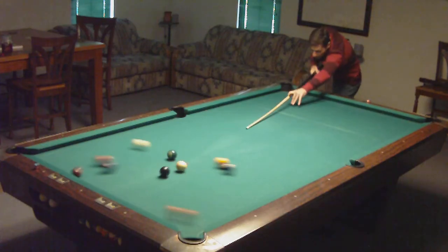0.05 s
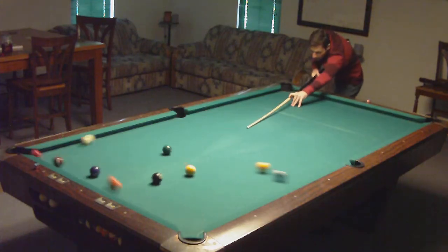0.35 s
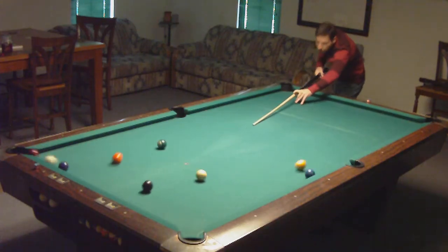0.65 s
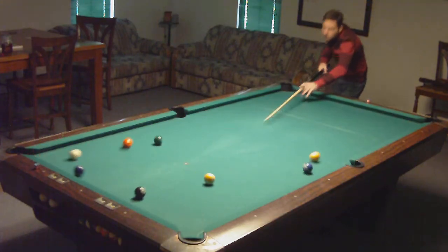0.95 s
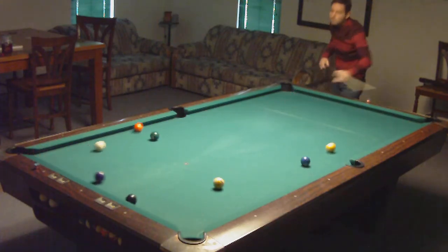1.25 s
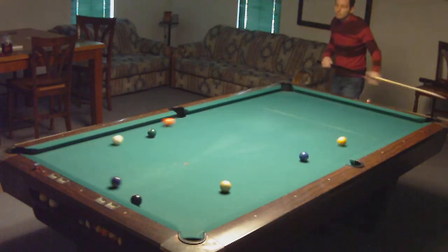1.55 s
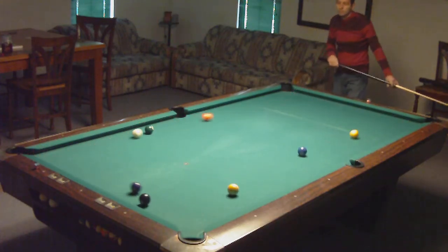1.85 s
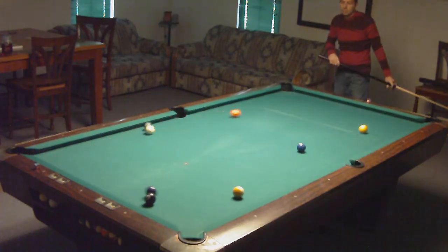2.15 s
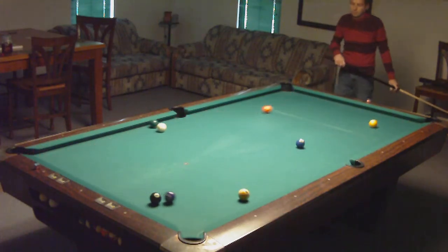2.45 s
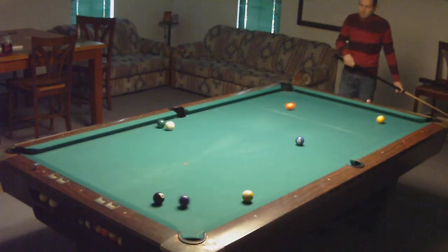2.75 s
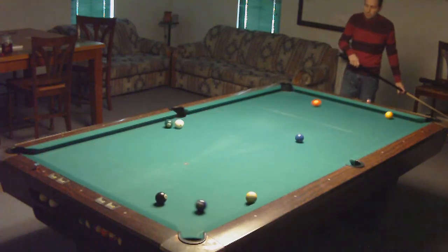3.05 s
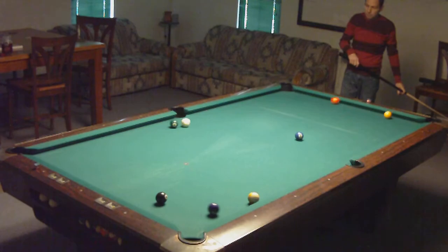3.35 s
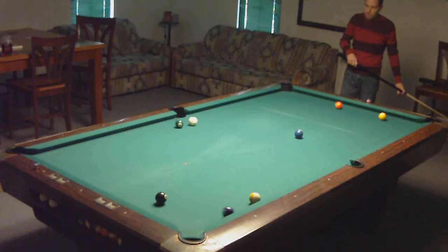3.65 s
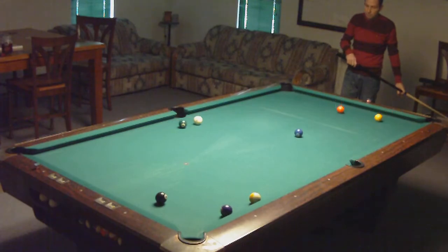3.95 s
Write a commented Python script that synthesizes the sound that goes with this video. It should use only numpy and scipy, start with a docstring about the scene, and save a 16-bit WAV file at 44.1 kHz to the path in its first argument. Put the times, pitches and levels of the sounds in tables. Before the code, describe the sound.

Pool balls crack loudly in a break shot, then clack together and knock against rails and pockets for about a second. They roll with a low rumble and one gentle late click, heard close by in a quiet living room.

```python
"""A break shot at pool

Close by in a quiet living room, balls clack in brief elastic collisions. Blows on rails and pockets
excite the damped modes of wood and slate, and rolling balls rumble through the table's body.
One late, gentle clack reveals the reverberation; the cue slides through a hand, over hiss and a thin
whine. The loudest impacts overload the microphone input and are clipped."""
import sys
import numpy as np
from scipy import signal
from scipy.fft import rfft, irfft
from scipy.io import wavfile

SR = 44100
rng = np.random.default_rng(int(sys.argv[2]) if len(sys.argv) > 2 else 0)


def bounce(signal):
    """Save signal as a 16-bit WAV file at the path given by the first command-line argument."""
    frames = np.transpose(np.atleast_2d(signal))
    limited = np.clip(frames, -1, 1)
    pcm = np.round(limited * 32767).astype(np.int16)
    wavfile.write(sys.argv[1], SR, pcm)


N = 176400
TIME = np.arange(N) / SR

# ball against ball: (time [s], direct peak level [dB])
BALL_COLLISIONS = [(.001, 32.5), (.028, 29), (.058, 16), (.088, 22.5), (.112, 19), (0.148, -3),
                   (0.2706, 14), (.296, 6), (0.3253, 4.5), (.5555, 12.5), (0.676, 11), (0.788, 7),
                   (0.8483, 12), (.987, 5.5), (1.009, 18), (1.046, 4.5), (1.128, 2.5), (2.161, -5.5)]
# ball against rail or pocket: (time [s], wood level [dB], thump level [dB], crack level [dB])
RAIL_IMPACTS = [(.035, 1, -3.5, 17), (.135, 4, -16.5, -14), (.175, -14.5, -11, -20), (0.214, -43, -17, -26),
                (0.276, -39, -28, -19.5), (.513, -5, -25, -36), (.791, -0.5, -11, 1),
                (.822, -4.5, -7.5, -22), (1.001, 1, -7.5, 1), (1.036, 1, -4, -11), (1.075, -13, -25.5, -19),
                (1.11, -11, -59, -10), (1.142, -8.5, -17, -7), (1.175, -20, -14.5, -13.5),
                (1.208, -20.5, -22.5, -14.5), (1.547, -28.5, -30.5, -26), (3.32, -47.5, -46.5, -49),
                (3.51, -44, -41.5, -56)]
# modes of the wooden rail and pocket: (frequency [Hz], relative level [dB], T60 [s])
WOOD_MODES = [(254.5, -19, .15), (368.3, -4.5, 0.046), (435.3, -4, 0.063), (521, -1, 0.045),
              (606, -2.5, 0.047), (660, -11.5, 0.073), (778.3, -5, .06), (944, -11.5, 0.055),
              (1100, -12.5, 0.021)]
# modes of slate and cabinet: (frequency [Hz], relative level [dB], T60 [s])
BODY_MODES = [(76.9, -4, 0.21), (102, -1.5, 0.088), (127.7, -2, 0.22), (157, -1.5, 0.15), (200, -0.5, .09),
              (251.1, 2, 0.23), (290.3, -1, 0.15), (325.7, 3.5, .16), (342, 2, 0.074)]
# envelope of the rolling: (time [s], relative level [dB])
ROLL_ENVELOPE = [(0, -29.5), (1.25, -47.5), (1.45, -37.5), (1.6, -43.5), (1.76, -44.5), (1.88, -36),
                 (2.05, -40.5), (2.25, -41), (2.58, -41.5), (2.7, -45), (3.4, -46), (4, -55.5)]
# spectrum of the rolling: (frequency [Hz], relative level [dB])
RUMBLE_SPECTRUM = [(35, -21), (75, 3.5), (130, -10), (250, -23), (600, -32), (1500, -30), (5000, -30.5),
                   (9000, -69.5)]
# spectrum of the sliding cue: (frequency [Hz], relative level [dB])
FRICTION_SPECTRUM = [(500, -6), (2500, -6), (5000, -4), (9000, -1), (15000, -15)]
# reflections from cloth, rails and lamp: (delay [s], gain [dB])
NEAR_REFLECTIONS = [(.0019, -2), (.0034, -2.5), (.0041, -2.5), (.0095, -12.5)]
# reflections from ceiling and walls: (delay [s], gain [dB])
WALL_REFLECTIONS = [(0.0223, -26.5), (.028, -11.5), (0.034, -19), (0.043, -22), (.05, -18)]
# reverberation time of the room: (frequency [Hz], T60 [s])
REVERB_TIMES = [(80, 0.6), (300, 0.76), (900, 0.69), (2000, 0.57), (4000, 0.46), (10000, 0.3)]
# stereo width of reverberation and rumble: (frequency [Hz], side relative to mid [dB])
DIFFUSE_WIDTH = [(100, -23), (1000, -24), (2200, -18.5), (4500, -10.5), (9000, -3)]
# spectrum of room tone and hiss: (frequency [Hz], relative level [dB])
HISS_SPECTRUM = [(15, -2), (25, 4.5), (75, -5.5), (326, -19.5), (488, -16), (673, -22), (749, -19),
                 (7090, -26.5), (7680, -24), (8320, -24.5), (15000, -27.5)]
# stereo width of hiss and cue: (frequency [Hz], side relative to mid [dB])
HISS_WIDTH = [(60, -8), (200, -7.5), (500, -1.5), (1500, -2.5), (8000, -1.5)]

CONTACT_S, CONTACT_EXPONENT = .00041, .07  # contact time at 0 dB; power law that shortens it
BALL_LOW_HZ, BALL_HIGH_HZ, BALL_BASS_CUT_HZ = 2052, 3277, 623
CRACK_BAND_HZ, SNAP_BAND_HZ = (980, 4370), (4380, 11900)
CUSHION_RISE_S, MODE_SCATTER_DB = .0039, 1.5
SNAP_THRESHOLD_DB, SNAP_DB, SNAP_SLOPE = -4, -30.5, 1.33  # slope: dB per dB of the hit
RIM_S, RIM_HZ, RIM_T60_S, RIM_DB = .987, 1850, .09, 3
RUMBLE_DB, BOOM_DB, BOOM_BAND_HZ = -7, -10, (70.6, 82.6)
SLIDE_CENTRE_S, SLIDE_SIGMA_S, SLIDE_DB = 2.41, .032, -48
HISS_DB, WHINE_HZ, WHINE_DB = -49.5, 7860, -63
REVERB_BUILD_S, REVERB_LENGTH_S = .0031, 1
CLIP_CEILING, CLIP_HARDNESS = .48, 14
WIDEN_ABOVE_HZ, WIDEN_DB = 5500, 2
LOW_CUT_HZ, HIGH_CUT_HZ = 33.8, 16462


def ball_clacks():
    """Hertzian contact: each collision radiates one force pulse, shorter for a harder hit."""
    out, t = np.zeros((2, N)), TIME[:SR // 50]
    for (onset, db), tail in zip(BALL_COLLISIONS, reverb_tails(len(BALL_COLLISIONS))):
        contact_s = CONTACT_S * from_db(-db * CONTACT_EXPONENT)
        force = np.abs(np.sin(np.pi * np.minimum(t / contact_s, 1))) ** 1.5
        radiated = butter(butter(force, BALL_LOW_HZ, "high"), BALL_BASS_CUT_HZ, "high")
        click = unit_peak(butter(radiated, BALL_HIGH_HZ, "low", order=4))
        echoes = vary_delays(NEAR_REFLECTIONS + WALL_REFLECTIONS)
        add(out, onset, from_db(db) * in_room(click, tail, reverb_db=-1.5, echoes=echoes))
        add(out, onset, impact_snap(db, tail))
    return out


def rail_knocks():
    """Impact excitation: a blow on rail or pocket cracks and sets the wood and the table ringing."""
    out = np.zeros((2, N))
    crack = unit_peak(butter(signal.unit_impulse(SR // 100), CRACK_BAND_HZ, "band"))
    cushion = 1 - np.exp(-TIME[:SR // 2] / CUSHION_RISE_S)  # rubber takes up the blow gradually
    for (onset, wood_db, thump_db, crack_db), tail in zip(RAIL_IMPACTS, reverb_tails(len(RAIL_IMPACTS))):
        add(out, onset, from_db(wood_db) * in_room(cushion * struck(WOOD_MODES), tail, reverb_db=3))
        add(out, onset, from_db(thump_db) * in_room(struck(BODY_MODES), tail, reverb_db=-1.5))
        echoes = vary_delays(NEAR_REFLECTIONS)
        add(out, onset, from_db(crack_db) * in_room(crack, tail, reverb_db=7.5, echoes=echoes))
        add(out, onset, impact_snap(crack_db, tail))
    return out


def impact_snap(hit_db, tail):
    """Nonlinear brightening: above a threshold, a treble snap grows faster than the hit itself."""
    tick = unit_peak(butter(signal.unit_impulse(SR // 100), SNAP_BAND_HZ, "band", order=1))
    gain = (hit_db > SNAP_THRESHOLD_DB) * from_db(SNAP_DB + SNAP_SLOPE * hit_db)
    return gain * in_room(tick, tail, reverb_db=12)


def rim_ping():
    """Free vibration: a pocket's rim, caught by a ball, rings briefly in a single mode."""
    out = np.zeros((2, N))
    ping = struck([(RIM_HZ, 0, RIM_T60_S)])
    add(out, RIM_S, from_db(RIM_DB) * in_room(ping, reverb_tails(1)[0], reverb_db=-27))
    return out


def rolling_balls():
    """Forced vibration: rolling balls rumble and keep the table's lowest mode booming."""
    rumble = noise(RUMBLE_SPECTRUM, DIFFUSE_WIDTH)
    boom = butter(noise(RUMBLE_SPECTRUM, DIFFUSE_WIDTH), BOOM_BAND_HZ, "band", order=1)
    envelope = from_db(np.interp(TIME, *np.transpose(ROLL_ENVELOPE)))
    return envelope * (from_db(RUMBLE_DB) * rumble + from_db(BOOM_DB) * boom / boom.std())


def cue_slide():
    """Sliding friction: the shaft passes through a hand with a short, faint swish."""
    envelope = np.exp(-((TIME - SLIDE_CENTRE_S) / SLIDE_SIGMA_S) ** 2 / 2)
    return from_db(SLIDE_DB) * envelope * noise(FRICTION_SPECTRUM, HISS_WIDTH)


def background():
    """Stationary noise floor: room tone, microphone hiss and a thin electronic whine."""
    whine = from_db(WHINE_DB) * np.sqrt(2) * np.sin(2 * np.pi * WHINE_HZ * TIME)
    return from_db(HISS_DB) * noise(HISS_SPECTRUM, HISS_WIDTH) + whine


def struck(modes):
    """Modal superposition: damped sinusoids whose strengths vary a little from blow to blow."""
    hz, db, t60 = np.array(modes).T[:, :, None]
    t = TIME[:SR // 2]
    polarity = (-1) ** np.arange(len(modes))[:, None]
    gains = polarity * from_db(db + MODE_SCATTER_DB * rng.standard_normal(db.shape))
    partials = gains * np.sin(2 * np.pi * hz * t) * from_db(-60 * t / t60)
    return unit_peak(partials.sum(axis=0))


def reverb_tails(count):
    """Diffuse field: decaying stereo noise for each spot on the table; the treble dies first."""
    size = int(REVERB_LENGTH_S * SR)
    t, hz = TIME[:size], np.arange(size // 2 + 1) * SR / size
    spectra = rfft(rng.standard_normal((count, 2, size)).astype(np.float32))
    spectra[:, 1] *= from_db(at_hz(DIFFUSE_WIDTH, hz))
    tails = 0
    for centre, t60 in REVERB_TIMES:
        band = at_hz([(f, f == centre) for f, _ in REVERB_TIMES], hz)
        tails = tails + irfft(spectra * band, size) * from_db(-60 * t / t60)
    tails *= 1 - np.exp(-t / REVERB_BUILD_S)
    mid, side = tails[:, 0], tails[:, 1]
    mean_energy = np.sum(mid ** 2) / count
    return np.stack([mid + side, mid - side], axis=1) / np.sqrt(mean_energy)


def in_room(sound, tail, reverb_db, echoes=()):
    """Convolution with the room's response: direct path, early reflections and diffuse tail."""
    response = tail * from_db(reverb_db)
    response[:, 0] += 1
    for delay, db in echoes:
        response[:, int(delay * SR)] += from_db(db)
    return signal.fftconvolve(sound[None], response, axes=1)


def vary_delays(echoes):
    """Path length: echo delays differ a little for every spot on the table."""
    return [(delay * rng.uniform(.88, 1.12), db) for delay, db in echoes]


def noise(spectrum, width):
    """Spectral shaping: coloured stereo noise whose mid signal has unit rms."""
    hz = np.arange(N // 2 + 1) * SR / N
    mid, side = rfft(rng.standard_normal((2, N))) * from_db(at_hz(spectrum, hz))
    mid, side = irfft(mid, N), irfft(side * from_db(at_hz(width, hz)), N)
    return np.array([mid + side, mid - side]) / mid.std()


def from_db(db):
    """Amplitude ratio of a level in decibels."""
    return 10 ** (np.asarray(db) / 20)


def at_hz(points, hz):
    """Interpolation on a log-frequency axis."""
    points = np.array(points)
    return np.interp(np.log(hz + 1e-9), np.log(points[:, 0]), points[:, 1])


def butter(x, hz, kind, order=2):
    """Butterworth filtering."""
    return signal.sosfilt(signal.butter(order, hz, kind, fs=SR, output="sos"), x)


def unit_peak(x):
    """Normalisation to a peak of 1."""
    return x / np.abs(x).max()


def add(out, onset_s, sound):
    """Superposition of a sound from its onset."""
    start = int(onset_s * SR)
    out[:, start:start + sound.shape[1]] += sound[:, :N - start]


def scene():
    """Linear superposition: the pressures of all sources add at the microphones."""
    return background() + rolling_balls() + cue_slide() + ball_clacks() + rail_knocks() + rim_ping()


def record(dry):
    """Saturation flattens the peaks; the treble is then widened and both ends of the spectrum cut."""
    drive = np.abs(dry / CLIP_CEILING)
    clipped = dry / (1 + drive ** CLIP_HARDNESS) ** (1 / CLIP_HARDNESS)
    treble_side = butter((clipped - clipped[::-1]) / 2, WIDEN_ABOVE_HZ, "high", order=1)
    widened = clipped + (from_db(WIDEN_DB) - 1) * treble_side
    steep_lowpass = signal.cheby2(14, 70, HIGH_CUT_HZ, fs=SR, output="sos")
    return signal.sosfilt(steep_lowpass, butter(widened, LOW_CUT_HZ, "high"))


dry = scene()
out = record(dry)
bounce(out)
```